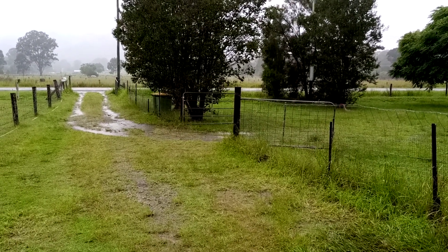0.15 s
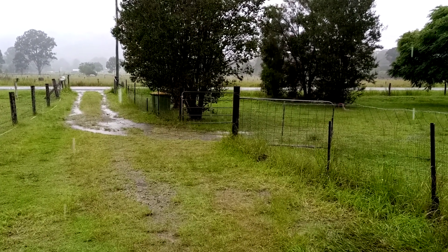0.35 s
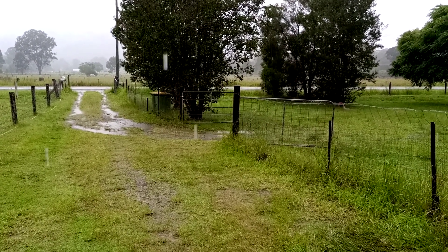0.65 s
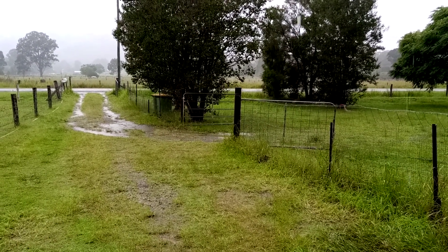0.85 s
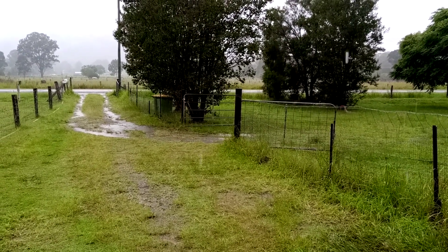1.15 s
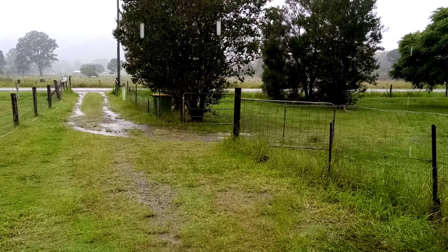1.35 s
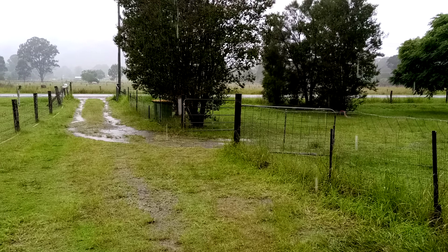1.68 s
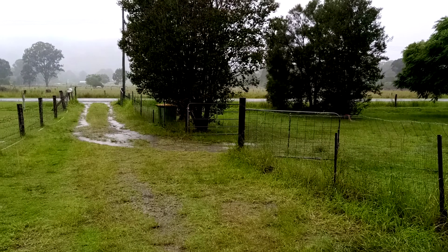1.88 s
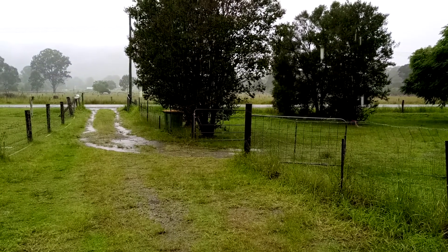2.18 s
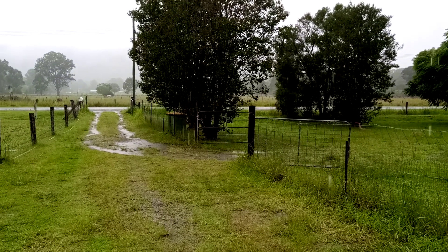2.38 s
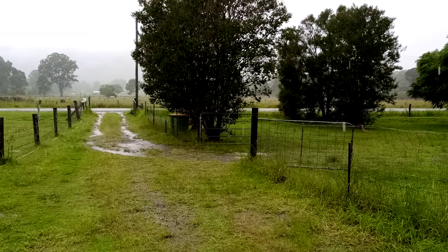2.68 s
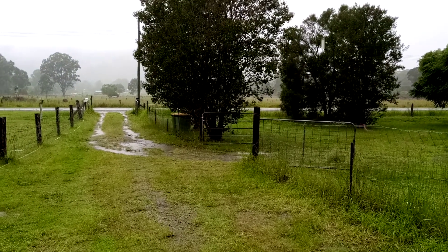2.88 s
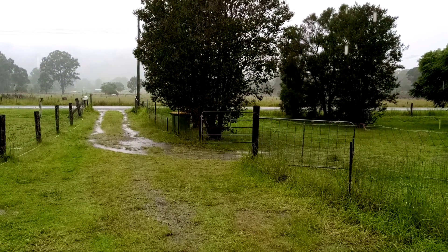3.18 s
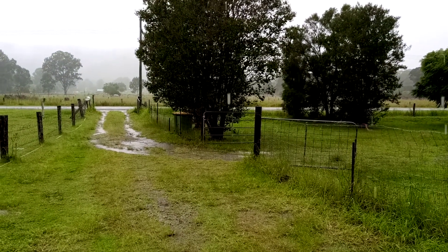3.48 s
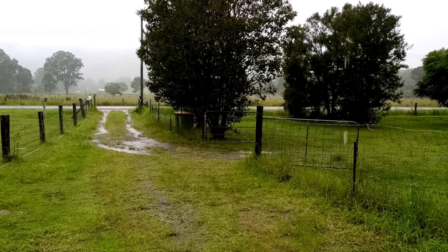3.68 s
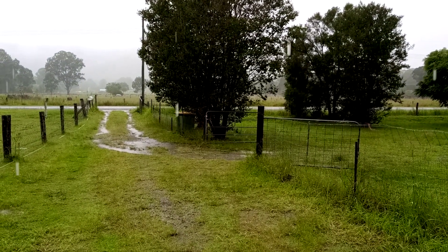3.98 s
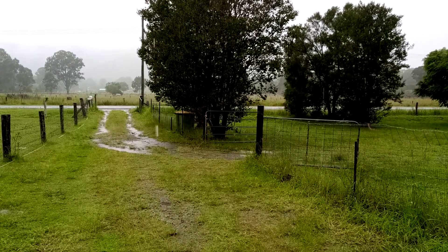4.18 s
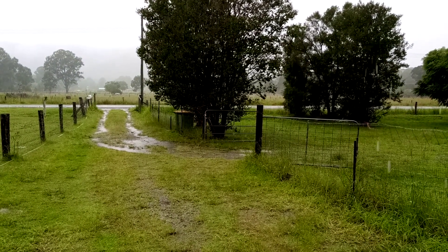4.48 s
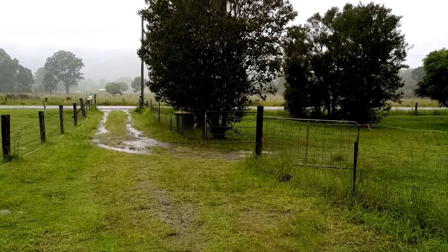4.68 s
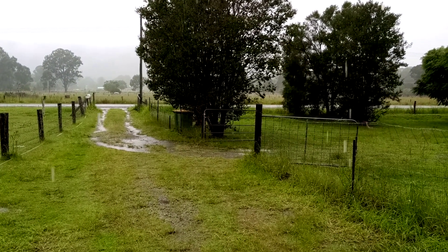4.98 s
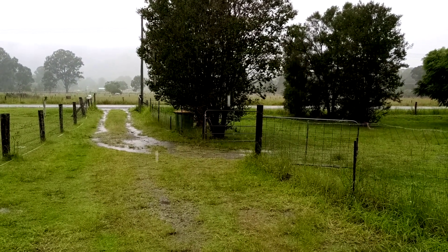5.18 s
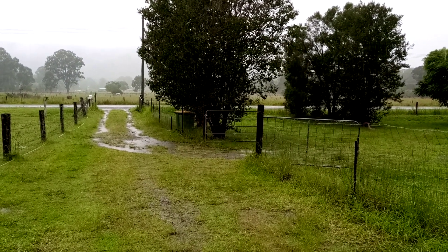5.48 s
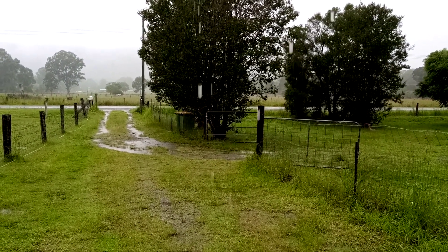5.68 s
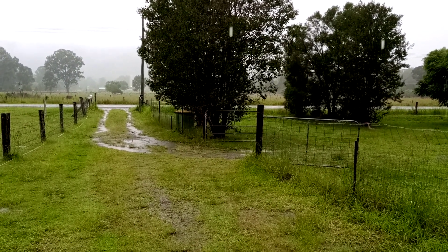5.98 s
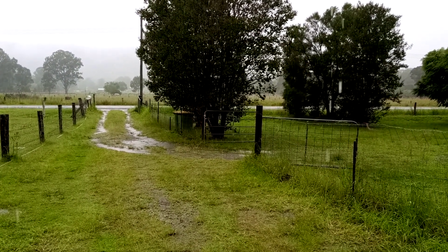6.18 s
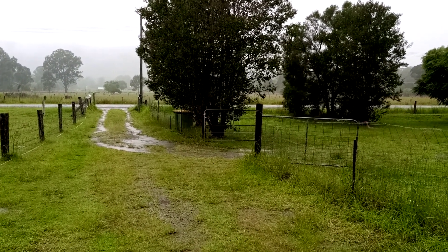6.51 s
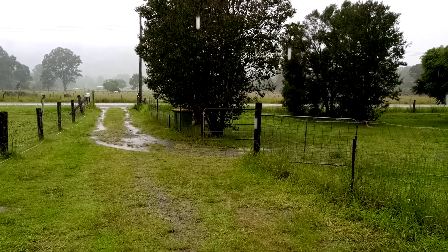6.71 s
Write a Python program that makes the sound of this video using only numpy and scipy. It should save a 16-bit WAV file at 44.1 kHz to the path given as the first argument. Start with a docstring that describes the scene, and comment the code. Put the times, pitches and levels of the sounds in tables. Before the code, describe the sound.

Sharp rising bird chirps with brief held notes ring over constant soft rain, crisp near drops ticking, a farther bird whistling low.

```python
"""Rain and small birds.

Steady rain on wet grass and puddles, heard by a mono phone microphone under a shelter's edge.
Far drops are filtered noise that merges into hiss; near drops are short noise bursts that tick.
A small bird close by chirps upward, adds short held notes and is answered, all sung by sums of sines
and smeared by the echoes of wet trees and walls. A farther bird whistles low; a faint rumble lies below.
"""
import sys
import numpy as np
from scipy import signal
from scipy.fft import rfft, irfft, next_fast_len
from scipy.io import wavfile
from scipy.ndimage import uniform_filter1d

SR = 44100
rng = np.random.default_rng(int(sys.argv[2]) if len(sys.argv) > 2 else 0)


def level_to_linear(level):
    """Convert decibel levels to linear amplitude factors, elementwise."""
    exponent = np.asarray(level, float) / 20
    return 10 ** exponent


def wrap_up_sound(samples):
    """Save the sound to the file named by the first command line argument, as 16-bit audio."""
    columns = np.atleast_2d(samples).T
    # keep every value between -1 and 1, then stretch to whole-number steps
    tamed = np.clip(columns, -1, 1)
    steps = np.round(tamed * 32767).astype(np.int16)
    wavfile.write(sys.argv[1], SR, steps)


N = 302085  # length in samples


# Colour of the far rain's hiss. Each row: frequency in Hz, relative strength in dB per Hz.
RAIN_COLOUR = [(25, -30), (45, -17), (62, -0.5), (160, -2), (230, -3.5), (384, -10), (632, -2), (1100, -1),
               (1670, 0.5), (2200, -3.5), (2900, -9), (5000, -10.5), (16000, -11)]


def far_rain():
    """Countless far drops: smooth in the middle, flickering more in the treble where nearer drops rule."""
    far = shape(rng.standard_normal(N), RAIN_COLOUR)
    low = lowpass(far, 6800)
    below_top = lowpass(far, 11500)
    treble = below_top - low
    top = far - below_top
    deep = band(low, 193, 470)

    # Each number before a walk is roughly the spread of that wandering, in dB.
    swell, gusts = walk(0.84), walk(9)
    low_part = low * level_to_linear(0.66 * swell + 0.23 * walk(6))
    # Heavy drips thud on the ground in loose clusters; the -1 takes out the steady deep part.
    thuds = deep * (level_to_linear(2.3 * walk(6)) - 1)
    treble_part = treble * level_to_linear(0.8 * swell + 1.2 * gusts + 1.5 * walk(30))
    top_part = top * level_to_linear(0.55 * swell + 1.0 * gusts + 1.2 * walk(10) + 2.0 * walk(40))
    return level(low_part + thuds + treble_part + top_part, -44)


# The loudest near drops. Each row: start in seconds, then the levels of body, tick and fizz in dB,
# each taken over the first 2 ms, before the microphone.
LOUD_DROPS = [(.1956, -55, -40, -41), (.6271, -52, -39, -35), (.7673, -54, -38, -42),
              (1.0142, -56, -39.5, -51), (1.0252, -56, -39, -40), (1.2871, -52, -45, -36),
              (1.4063, -55, -49, -35), (1.4447, -56, -49, -32), (1.4876, -46, -40, -49),
              (1.6557, -52, -37, -38), (1.7061, -48, -37, -55), (1.7984, -54, -40, -31),
              (1.9775, -51, -49, -34), (2.1431, -44.5, -42, -46), (2.2444, -50, -35.5, -39),
              (2.4814, -56, -56, -36), (2.6315, -42, -30.5, -29), (2.8635, -51, -36, -43),
              (2.874, -50, -47, -32), (3.0541, -53, -39, -36), (3.4931, -50, -54, -38),
              (3.8403, -51, -38, -33), (3.941, -54, -37, -40), (4.0144, -45, -46, -48),
              (4.1406, -46, -36, -49), (4.1615, -55, -42, -36), (4.4559, -40.5, -34, -20.5),
              (4.9732, -55, -39, -33), (5.3429, -38.5, -35, -35), (5.5484, -52, -40, -45),
              (5.735, -54, -42, -56), (6.0707, -55, -57, -36), (6.172, -53, -38, -51),
              (6.5756, -41, -52, -34)]


def near_drops():
    """Single drops close by: the loudest ones at set times over a dense random patter."""
    return patter(count=750, body_db=-65, tick_db=-55, fizz_db=-53, spread_db=3.6,
                  colour_db=10) + splashes(LOUD_DROPS)


def patter(count, body_db, tick_db, fizz_db, spread_db, colour_db):
    """Dense smaller drops: many faint, a few clear, each of its own colour."""
    chance = rng.random((count, 5))
    start_s = chance[:, 0] * N / SR
    size_db = -spread_db * np.log(1 - 0.97 * chance[:, 1:2])  # the 0.97 limits the biggest drop
    colour = colour_db * (chance[:, 2:] - 0.5)
    parts_db = size_db + colour + [body_db, tick_db, fizz_db]
    return splashes(np.column_stack([start_s, parts_db]))


# The three parts of a drop: body, tick and fizz, one row for each.
# Each row: low edge in Hz, high edge in Hz, decay time of the spray in seconds.
SPLASH_PARTS = [(3500, 5850, .004), (7230, 11000, .007), (11600, 17000, .009)]


def splashes(drops):
    """Each drop is a sharp burst with a short spray; big ones have body, bursting ones fizz."""
    out, t = np.zeros(N), np.arange(1024) / SR
    noise = rng.standard_normal((len(drops), 1024))
    parts = []
    for lo_hz, hi_hz, spray_s in SPLASH_PARTS:
        decay = np.exp(-t / 0.0012) + 0.49 * np.exp(-t / spray_s)
        parts.append(band(noise * decay, lo_hz, hi_hz))
    for k, (s, *parts_db) in enumerate(drops):
        for part, db in zip(parts, parts_db):
            first_2_ms = np.sqrt(np.mean(part[k][:88] ** 2))
            add(out, part[k] * level_to_linear(db) / first_2_ms, s)
    return out


# How the beak passes sound on to the air. Each row: frequency in Hz, gain in dB.
BEAK_GAIN = [(3400, 2), (4900, -2.5), (5800, 1), (6500, -0.5), (7500, 2.5), (9800, 2.5), (10800, -7),
             (13000, -24)]


def near_birds():
    """The close bird's chirps and notes and a second bird's answers, coloured by the beak's radiation."""
    out = np.zeros(N)
    rising_chirps(out)
    held_notes(out)
    answers(out)
    return shape(out, BEAK_GAIN)


# Rising chirps. Each row: start in seconds, length in seconds, top pitch in Hz, then base levels in dB
# of the second harmonic and of the fundamental, to which the next two tables add.
CHIRPS = [(0.254, .058, 3730, -40.5, -53), (.708, 0.055, 3500, -41, -51), (1.164, 0.062, 3850, -41, -50),
          (1.54, 0.056, 3540, -40.5, -51), (1.996, .057, 3900, -38.5, -49),
          (2.886, 0.058, 3280, -40, -47.5), (3.155, 0.1, 3406, -41, -50), (3.88, 0.058, 3780, -38.5, -49),
          (4.328, .069, 3470, -39, -47), (5.033, .05, 3400, -42.5, -44.5), (5.435, 0.055, 3320, -42, -43),
          (6.266, .055, 3870, -39, -45.5), (6.792, .055, 3850, -37, -46.5)]
# How the second harmonic follows the pitch. Each row: pitch in Hz, level added in dB.
SECOND_BY_PITCH = [(2300, -13.5), (2620, -8.5), (2780, -0.5), (3150, -3.5), (3400, -4.5), (3800, -5.5)]
# How the fundamental follows the pitch. Each row: pitch in Hz, level added in dB.
FIRST_BY_PITCH = [(2300, -17), (2780, -8), (3150, -2.5), (3400, -2.5), (3800, 3.5)]


def rising_chirps(out):
    """Pitch climbs steadily to a knee, then bends to its top; harmonic levels follow the pitch."""
    start_hz, rise_hz_per_s, knee_hz, bend = 2300, 21500, 3090, 0.445
    knee_s = (knee_hz - start_hz) / rise_hz_per_s
    for s, length, top_hz, second_db, first_db in CHIRPS:
        t = np.arange(0, length, 1 / SR)
        # Low tops level off.
        ease = max(rise_hz_per_s * (length - knee_s) / (top_hz - knee_hz), 1) ** bend
        beyond = np.clip((t - knee_s) / (length - knee_s), 0, 1)  # 0 at the knee, 1 at the end
        climb = np.minimum(start_hz + rise_hz_per_s * t, knee_hz)
        hz = climb + (top_hz - knee_hz) * (1 - (1 - beyond) ** ease)
        second = second_db + np.interp(hz, *np.transpose(SECOND_BY_PITCH))
        first = first_db + np.interp(hz, *np.transpose(FIRST_BY_PITCH))
        sing(out, s, t, hz, second, first, edge_s=0.003)


# Short held notes. Each row: start in seconds, length in seconds, first pitch in Hz, held pitch in Hz,
# second harmonic in dB at the start, before flutter, echoes and beak.
HELD_NOTES = [(0.763, .025, 2343, 2380, -49), (1.22, .025, 2405, 2390, -46.5),
              (1.597, .025, 2460, 2400, -43), (2.935, .048, 2136, 2330, -41.5),
              (3.258, .022, 2280, 2310, -47.5), (3.41, .03, 2145, 2216, -54), (3.94, .02, 2470, 2410, -46),
              (4.392, 0.032, 2400, 2378, -41.5), (5.078, 0.04, 2170, 2330, -45),
              (5.487, .042, 2166, 2340, -44)]


def held_notes(out):
    """Pitch hooks quickly into a held tone while the level sags."""
    hook_s, sag_db_per_s, first_below_second_db = 0.013, -130, -23
    for s, length, first_hz, held_hz, db in HELD_NOTES:
        t = np.arange(0, length, 1 / SR)
        hz = held_hz + (first_hz - held_hz) * np.exp(-t / hook_s)
        second_db = db + sag_db_per_s * t
        sing(out, s, t, hz, second_db, second_db + first_below_second_db, edge_s=0.0028)


# Answers of a second bird. Each row: start in seconds, length in seconds, first pitch in Hz,
# last pitch in Hz, fundamental in dB before flutter, echoes and beak.
ANSWERS = [(3.435, .105, 3020, 4060, -53.5), (4.596, .13, 3530, 4010, -59), (5.702, .05, 3450, 3640, -52.5),
           (5.753, 0.0545, 3760, 4040, -55.5)]


def answers(out):
    """A second bird's slower rising slides, led by the fundamental."""
    for s, length, first_hz, last_hz, db in ANSWERS:
        t = np.arange(0, length, 1 / SR)
        hz = first_hz + (last_hz - first_hz) * (t / length) ** 0.85  # rises a little faster at first
        sing(out, s, t, hz, second_db=db - 13, first_db=db, edge_s=0.012)


# Higher harmonics of a sung note. Each row: harmonic number, level in dB relative to the second harmonic.
UPPER_HARMONICS = [(3, -17), (4, -15)]


def sing(out, s, t, hz, second_db, first_db, edge_s):
    """One sung note, slightly rough, with its own randomly drawn echo pattern."""
    flutter = level_to_linear(2.6 * walk(349, len(t)))
    waver = 1 + 0.0089 * walk(202, len(t))
    phase = 2 * np.pi * np.cumsum(hz * waver) / SR
    upper = np.sin(2 * phase) + sum(level_to_linear(db) * np.sin(k * phase) for k, db in UPPER_HARMONICS)
    harmonics = level_to_linear(second_db) * upper + level_to_linear(first_db) * np.sin(phase)
    tone = np.sqrt(2) * fade(t, edge_s) * flutter * harmonics
    echoed = echoes(tone, direct_db=-3.5, near_db=-3, near_s=0.011, far_db=1, t60_s=0.51, reach_s=0.1)
    add(out, echoed, s)


# Low whistles of the far bird. Each row: start in seconds, length in seconds, first pitch in Hz,
# last pitch in Hz, level in dB before the echoes.
WHISTLES = [(3.7, .1, 2340, 2350, -63), (3.73, 0.14, 2055, 2020, -55.5), (3.9, 0.146, 2290, 2214, -59),
            (4.62, 0.17, 2265, 2210, -57.5), (5.679, 0.168, 1993, 2067, -56), (5.8, 0.14, 2340, 2300, -65)]


def far_bird():
    """Pure low whistles, each one sliding sine, mostly echo."""
    out = np.zeros(N)
    for s, length, first_hz, last_hz, db in WHISTLES:
        t = np.arange(0, length, 1 / SR)
        phase = 2 * np.pi * np.cumsum(np.linspace(first_hz, last_hz, len(t))) / SR
        add(out, np.sqrt(2) * level_to_linear(db) * fade(t, edge_s=0.017) * np.sin(phase), s)
    return echoes(out, direct_db=0.5, near_db=-1, near_s=0.015, far_db=2, t60_s=0.68, reach_s=0.2)[:N]


# Foliage scatters short waves best. Each row: frequency in Hz, gain of the echoes in dB.
LEAF_SCATTER = [(3000, -4), (4600, -1), (6000, 0), (9000, 1.5)]


def echoes(x, direct_db, near_db, near_s, far_db, t60_s, reach_s):
    """Direct sound, a quick scatter off nearby leaves, and a cloud that thins beyond the farthest trees."""
    t = np.arange(int(0.4 * SR)) / SR
    near = rng.standard_normal(len(t)) * np.exp(-t / near_s)
    far = rng.standard_normal(len(t)) * level_to_linear(-60 * t / t60_s) / (1 + (t / reach_s) ** 3)
    response = shape(level_to_linear(near_db) * even(near) + level_to_linear(far_db) * even(far), LEAF_SCATTER)
    response[0] += level_to_linear(direct_db)
    return signal.fftconvolve(x, response)


# Wavering low tones. Each row: centre in Hz, width in Hz, level in dB before the microphone.
RUMBLE_TONES = [(60, 10, -83), (80, 9.6, -68), (161, 14.5, -70)]


def rumble():
    """Narrow bands of noise, which sound like faint wavering low tones."""
    out = np.zeros(N)
    for hz, width_hz, db in RUMBLE_TONES:
        tone = band(rng.standard_normal(N), hz - width_hz / 2, hz + width_hz / 2)
        out += level(tone, db)
    return out


def shape(x, points):
    """Colours a sound by (Hz, dB) points joined on a log-frequency axis."""
    size = next_fast_len(len(x))
    hz, db = np.transpose(points)
    bins = np.maximum(np.arange(size // 2 + 1) * SR / size, 1)
    gain = level_to_linear(np.interp(np.log(bins), np.log(hz), db))
    return irfft(rfft(x, size) * gain, size)[:len(x)]


def band(x, lo_hz, hi_hz):
    """Gentle band-pass."""
    edges = [lo_hz, min(hi_hz, 0.45 * SR)]
    return signal.sosfilt(signal.butter(2, edges, "bandpass", fs=SR, output="sos"), x)


def lowpass(x, hz):
    """Low-pass run both ways, so it adds no delay and bands can be subtracted."""
    return signal.sosfiltfilt(signal.butter(3, hz, fs=SR, output="sos"), x)


def level(x, db):
    """Sets the rms level."""
    return x * level_to_linear(db) / np.sqrt(np.mean(x ** 2))


def add(out, x, s):
    """Mixes a short sound in at s seconds."""
    i = int(s * SR)
    out[i:i + len(x)] += x[:len(out) - i]


def walk(rate, size=N):
    """Random levels held 1 / rate seconds and smoothed twice; spread near 1."""
    k = int(SR / rate)
    steps = np.repeat(rng.standard_normal(size // k + 1), k)[:size]
    return 1.3 * uniform_filter1d(uniform_filter1d(steps, k), k)


def fade(t, edge_s):
    """Soft start and end of a note."""
    to_nearest_end = np.minimum(t - t[0], t[-1] - t)
    return np.sin(np.pi / 2 * np.clip(to_nearest_end / edge_s, 0, 1)) ** 2


def even(response):
    """Evens out the broad colour of a random echo pattern, with an overall gain near 1."""
    z = rfft(response)
    return irfft(z / np.sqrt(uniform_filter1d(np.abs(z) ** 2, size=60)), len(response))


def scene():
    """Everything reaches one microphone."""
    mono = far_rain() + near_drops() + near_birds() + far_bird() + rumble()
    return np.array([mono, mono])


# Microphone port. Each row: frequency in Hz, gain in dB.
PORT_GAIN = [(3000, -0.5), (4200, 2), (6400, 2), (7000, -3), (8080, -11), (9460, -3), (10300, -9),
             (11700, -23.5), (13900, -31), (14600, -24), (15700, -25), (16300, -60)]


def microphone_port(x):
    """The port colours the treble."""
    return shape(x, PORT_GAIN)


def low_pass(x):
    """Removes everything above the highest recorded frequency."""
    return signal.sosfilt(signal.butter(12, 16340, fs=SR, output="sos"), x)


def record(dry):
    """The microphone's sound goes to both channels alike."""
    mono = microphone_port(dry[0])
    return low_pass(np.array([mono, mono]))


dry = scene()
out = record(dry)
wrap_up_sound(out)
```